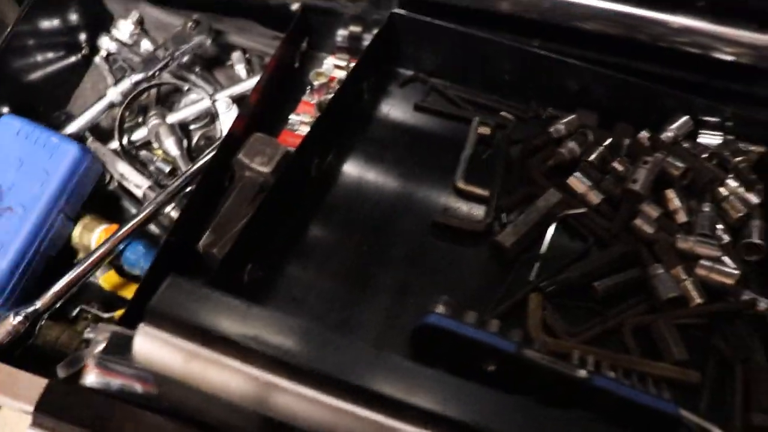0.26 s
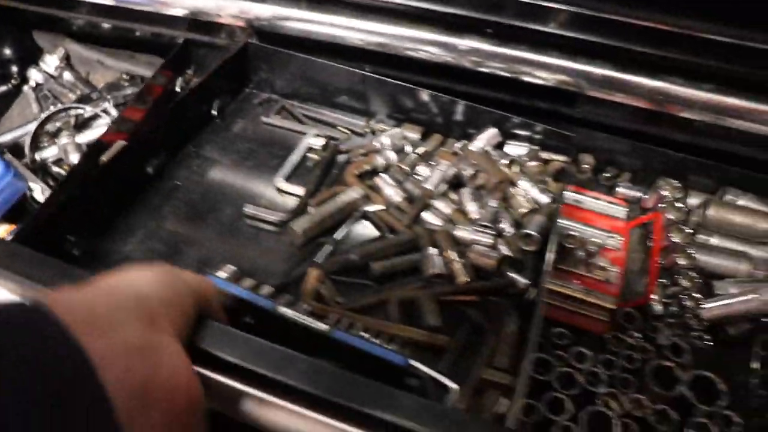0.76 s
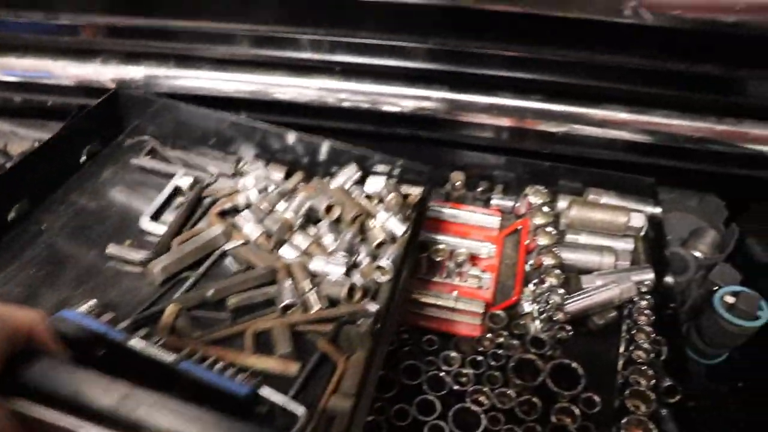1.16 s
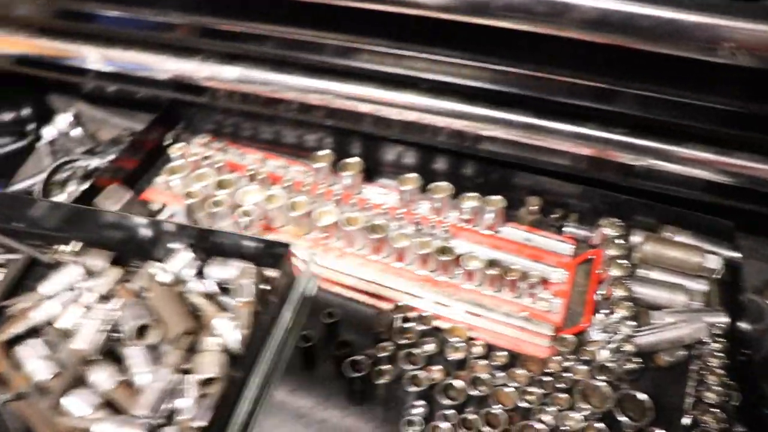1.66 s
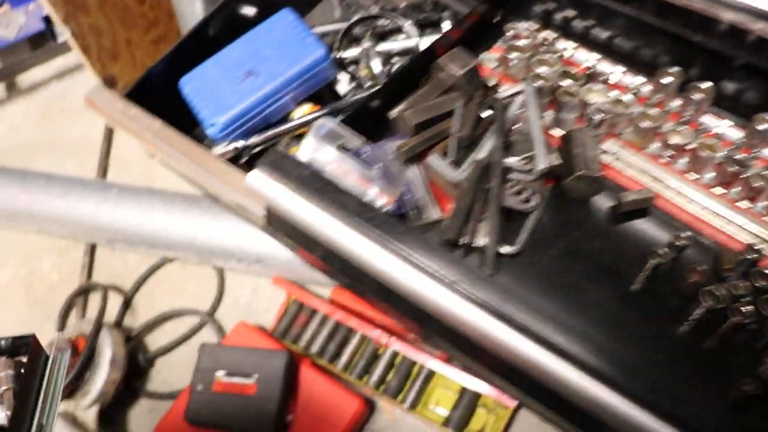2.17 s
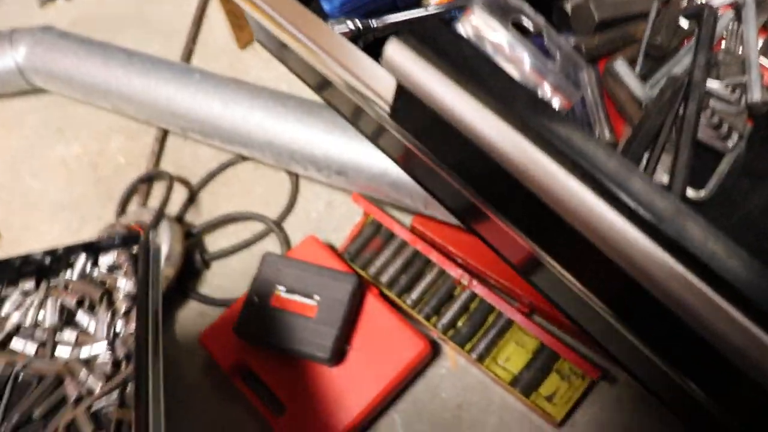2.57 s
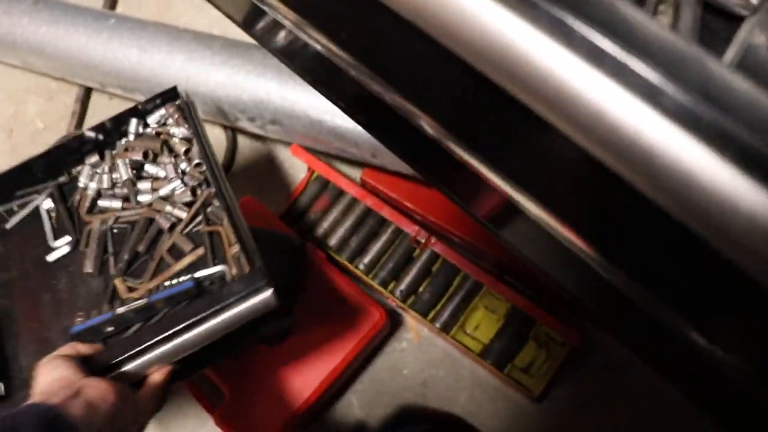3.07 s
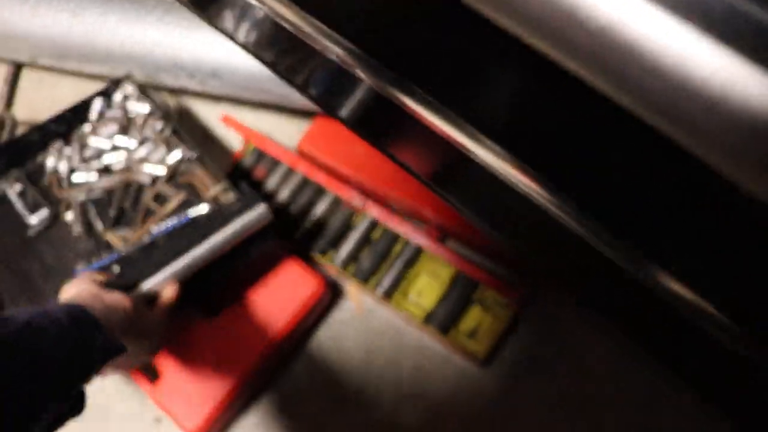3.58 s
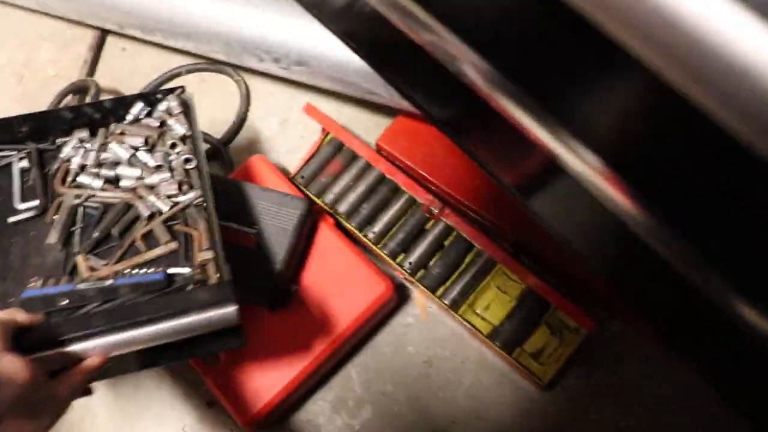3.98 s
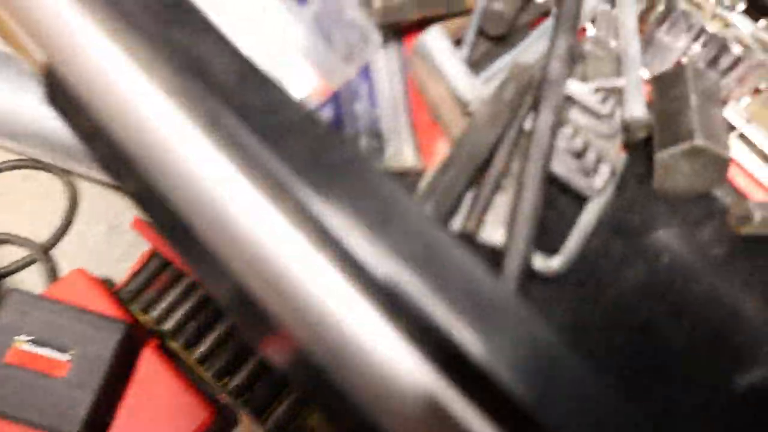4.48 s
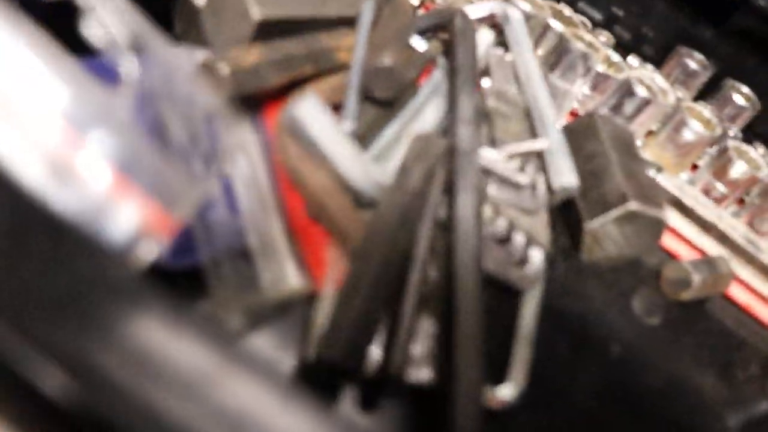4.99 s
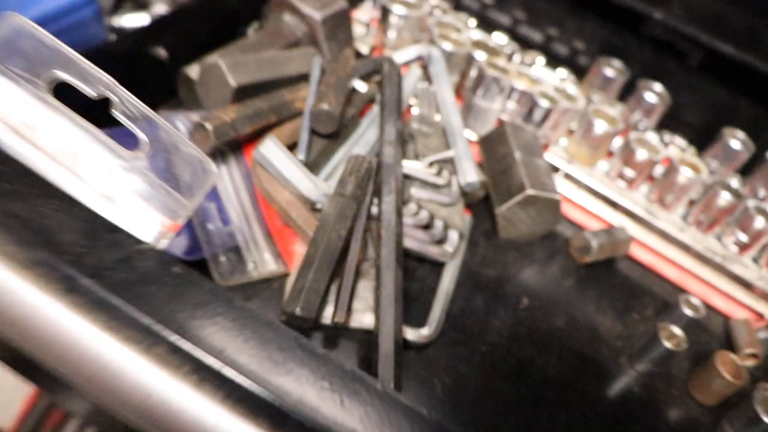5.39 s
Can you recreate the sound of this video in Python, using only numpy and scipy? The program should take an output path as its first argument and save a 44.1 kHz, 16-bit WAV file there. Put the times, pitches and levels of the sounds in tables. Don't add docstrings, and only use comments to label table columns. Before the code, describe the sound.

Close up in a quiet workshop, a steel tray of loose sockets bangs and scrapes across a drawer in dense clatter, the loudest knocks overloading. It lifts away with a light quick rattle, lands with a hard clank and gritty rubs, then lies nearly still. A few more clacks follow, then loose parts tumble in the drawer. Handheld stereo microphone, faint air and low handling rumble, load mostly left of middle.

```python
import sys
import numpy as np
from scipy import signal
from scipy.fft import rfft, irfft
from scipy.io import wavfile
from scipy.ndimage import uniform_filter1d

SR = 44100
rng = np.random.default_rng(int(sys.argv[2]) if len(sys.argv) > 2 else 0)


def volts_from_db(level):
    exponent = np.asarray(level, float) / 20
    return 10 ** exponent


def bounce(signal):
    frames = np.transpose(np.atleast_2d(signal))
    limited = np.clip(frames, -1, 1)
    pcm = np.round(limited * 32767).astype(np.int16)
    wavfile.write(sys.argv[1], SR, pcm)


N = 248724
T = np.arange(N) / SR

# (time [s], left-right level [dB], right lag [s])
PLACE = [
    (0, 3.5, 0.00014),
    (.7, -0.5, 0.000061),
    (1.5, 2, 0.000067),
    (2.5, 1, 0.00012),
    (3.3, 3, 0.000048),
    (4.3, 2, 0.00013),
    (4.8, 5, 0.00026),
    (5.64, 3.5, 0.0002),
]


def rms_one(x):
    return x / np.sqrt(np.mean(x ** 2) + 1e-20)


def at_hz(points, hz):
    point_hz, point_db = np.array(points)[:, :2].T
    return np.interp(np.log(hz + 1), np.log(point_hz), point_db)


def colour(x, points):
    hz = np.fft.rfftfreq(N, 1 / SR)
    return irfft(rfft(x) * volts_from_db(at_hz(points, hz)), N)


def pan(db):
    return volts_from_db(np.array([db / 2, -db / 2]))


def in_time(rows):
    s, *columns = np.transpose(rows)
    return [np.interp(T, s, column) for column in columns]


def lag_right(x):
    return np.interp(T - in_time(PLACE)[1], T, x)


def butter(x, order, hz, kind="low"):
    return signal.sosfilt(signal.butter(order, hz, kind, fs=SR, output="sos"), x)


def resonate(x, peaks):
    out, power = 0, 0
    for k, (hz, width, db) in enumerate(peaks):
        r = np.exp(-np.pi * width / SR)
        b = (1 - r * r) / 2 * volts_from_db(db) * (-1) ** k
        poles = [1, -2 * r * np.cos(2 * np.pi * hz / SR), r * r]
        out = out + signal.lfilter([b, 0, -b], poles, x + 1e-18)
        power += volts_from_db(db) ** 2 * np.pi * width / SR
    return out / np.sqrt(power)


def gliding(x, hz, width):
    out, state = np.zeros_like(x), np.zeros((2, 2))
    r = np.exp(-np.pi * width / SR)
    b = (1 - r * r) / 2 / np.sqrt(np.pi * width / SR)
    for i in range(0, N, 128):
        poles = [1, -2 * r * np.cos(2 * np.pi * hz[i] / SR), r * r]
        out[:, i:i + 128], state = signal.lfilter([b, 0, -b], poles, x[:, i:i + 128], zi=state)
    return out


def grit(per_s, size_db):
    # (frequency [Hz], level [dB])
    spread = [(100, -45), (400, -14.5), (1500, -5.5), (5000, -0.5), (15000, -0.5)]
    sizes = volts_from_db(size_db * np.minimum(rng.exponential(1, (2, N)), 5)) * rng.standard_normal((2, N))
    common, unlike = sizes * (rng.random((2, N)) < per_s / SR)
    unlike = colour(unlike, spread)
    return np.array([rms_one(common + unlike), rms_one(lag_right(common - unlike))])


def blows(times, levels_db, t60s, rise_s):
    out = np.zeros(N)
    for s, db, t60 in zip(times, levels_db, np.maximum(t60s, 0.005)):
        t = np.arange(round(t60 * SR)) / SR
        fall = (t / t60) ** 1.558
        shape = (1 - np.exp(-t / rise_s)) * volts_from_db(db - 60 * fall)
        i = round(s * SR)
        out[i:i + len(t)] += shape[:N - i]
    return out


def stutter(rate, depth_db):
    steps = rng.standard_normal(round(N / SR * 60) + 2)
    return volts_from_db(depth_db * np.interp(T * min(rate, 60), np.arange(len(steps)), steps))


def room_tone():
    # (frequency [Hz], density [dB per Hz])
    air_spectrum = [(59, -33), (100, 5.5), (181, 9), (620, -0.5), (1690, -20), (2520, -20.5), (8050, -18.5),
                    (14000, -64)]
    # (frequency [Hz], density [dB per Hz])
    rumble_spectrum = [(20, -36), (50, 8.5), (90, -0.5), (150, -23.5)]
    # (time [s], rumble level [dB])
    handling = [
        (0.0, -48),
        (0.14, -51),
        (2.32, -59),
        (2.39, -53),
        (3.22, -49),
        (3.3, -71),
        (3.58, -76),
        (3.79, -54),
        (5.64, -59),
    ]
    air_db = -51.5
    noise = grit(per_s=SR, size_db=0)
    rumble = colour(noise + 0.5 * rng.standard_normal((2, N)), rumble_spectrum)
    return volts_from_db(air_db) * rms_one(colour(noise, air_spectrum)) + volts_from_db(in_time(handling)[0]) * rms_one(rumble)


def knocks():
    # (time [s], body peak [dB], boom relative [dB], boom pitch [Hz])
    clacks = [
        (0.356, -16, -27, 360),
        (0.49, -10.5, 0.5, 188),
        (0.827, -18.5, 5, 422),
        (1.228, -2, -8.5, 486),
        (1.292, -20, 3.5, 950),
        (1.587, -19, -24, 259),
        (3.304, -4, -9, 945),
        (3.549, -35, -17, 395),
    ]
    # (time [s], body peak [dB], boom relative [dB], boom pitch [Hz])
    raps = [(.177, 0.5, -9, 273), (.203, 0, -8, 365), (.625, -17, -20, 600), (0.774, -13, 0, 470),
            (0.905, -12, 0, 440), (.916, -3, 0, 370), (1.413, -21, -14, 338), (1.562, -17.5, -8, 270),
            (2.356, -31.5, -3, 1100), (2.437, -26.5, 5.5, 184), (2.761, -17.5, -0.5, 202),
            (3.188, -17, -28, 476), (3.814, -39, -5, 1500), (3.827, -35, -3, 800), (4.168, -39, -1.5, 170),
            (4.381, -12, -23, 398)]
    # (time [s], body peak [dB], boom relative [dB], boom pitch [Hz])
    bumps = [(.635, -14, 7, 340), (0.723, -18, 4, 450), (.811, -21, 5, 470), (1.088, -20, 2, 950),
             (1.102, -22, 6, 290), (1.131, -24, 6, 850), (1.214, -18, -3, 900), (1.253, -13, -4, 450),
             (1.263, -16, -6, 500), (1.283, -13, -6, 500), (1.397, -12, -8, 300), (2.793, -30, 6, 210),
             (3.168, -30.5, -13, 136), (3.211, -23, -41, 406), (3.23, -24, -30, 400), (3.301, -12, -6, 600),
             (3.736, -39, 4, 1290), (3.856, -38.5, 4, 1615), (3.928, -34, -3.5, 1245),
             (4.245, -18, -28, 697), (4.256, -19, 3, 157), (4.3555, -21, 9, 327)]
    # (time [s], body peak [dB], boom relative [dB], boom pitch [Hz])
    jolts = [(0.237, -14.5, -7.5, 255), (.853, -23, 2, 400), (.946, -22, -1, 443), (1.17, -21.5, -5, 482),
             (1.187, -17.5, -17, 504), (1.398, -16, -10, 273), (2.399, -18.5, -6, 300),
             (2.728, -11, -3.5, 165), (3.389, -19, -7, 520), (4.262, -10, -17, 200), (4.278, -15, -20, 440),
             (4.464, -38, -11, 374)]
    # (time [s], body peak [dB], boom relative [dB], boom pitch [Hz])
    ticks = [(0.024, -36.5, -30, 400), (0.383, -14.5, -3, 332), (0.5106, -14, -4.5, 312),
             (0.619, -13, -24, 258), (1.171, -29, -20, 480), (1.224, -9.5, -7.5, 454),
             (1.3696, -13.5, -30, 624), (1.4133, -35, -14, 340), (1.564, -35, -15, 300),
             (1.576, -17.5, -7, 530), (1.5858, -5.5, -21, 261), (3.1884, -20.5, -12, 470),
             (3.3029, 1.5, -17, 546), (3.364, -12.5, -12, 454), (3.556, -30, -18, 400),
             (3.834, -25, -10, 304), (4.265, -16, -4.5, 405), (4.285, -34, -20, 400),
             (4.296, -26, -21, 400), (4.309, -15, -21, 400), (4.32, -17, -19, 400), (4.348, -18, -24, 400),
             (4.379, -20, -18, 400)]
    # (crack relative [dB], t60 [s])
    contact = [
        (-2.5, 0.043),
        (-9.5, 0.05),
        (-16.5, 0.047),
        (-13, 0.14),
        (-1.5, 0.02),
    ]
    # (time [s], body peak [dB], crack relative [dB], t60 [s])
    tumbles = [(4.619, -39, -24, 0.054), (4.643, -29.5, -5, 0.049), (4.674, -39.5, -5.5, 0.17),
               (4.737, -33.5, -5, 0.046), (4.782, -32.5, -12, 0.092), (4.805, -26.5, -8, 0.049),
               (4.854, -23, -38, 0.064), (4.872, -21, -29, 0.031), (4.892, 1.5, -2, 0.044),
               (4.972, -18.5, -22, 0.15), (4.993, -2.5, -3, 0.046), (5.148, -21, -7, 0.18),
               (5.167, -15.5, -9.5, 0.16), (5.267, -3.5, -3, 0.043), (5.321, -23, -3, 0.053),
               (5.52, -28, -30, 0.025)]
    drawer_boom_db, drawer_boom_hz = -37, 610
    rows = []
    for kind, (high_db, t60) in zip([clacks, raps, bumps, jolts, ticks], contact):
        rows += [(s, db, low_db, high_db, t60, hz) for s, db, low_db, hz in kind]
    return rows + [(s, db, drawer_boom_db, high_db, t60, drawer_boom_hz) for s, db, high_db, t60 in tumbles]


def thuds():
    kick_db, chatter_db = 19.5, 0.5
    out, contacts = np.zeros((2, N)), grit(per_s=6000, size_db=-0.5)
    t = np.arange(round(0.2 * SR)) / SR
    for s, body_db, low_db, high_db, t60, hz in knocks():
        i = round(s * SR)
        chatter = (1 - np.exp(-t / 0.0015)) * volts_from_db(chatter_db - 60 * t / (1.5 * t60))
        hit = contacts[:, i:i + len(t)]
        length = hit.shape[1]
        kick = volts_from_db(kick_db) * (t[:length] == t[40])
        hit = (chatter[:length] * hit + kick) * volts_from_db(body_db + low_db)
        flex = [(hz, 60, 0), (1.425 * hz, 150, -8), (0.8 * hz, 90, -10), (2.92 * hz, 300, -14)]
        out[:, i:i + length] += resonate(hit, flex)
    return out


def strokes():
    # (middle [s], length [s], level [dB], hiss relative [dB], ringing band [Hz])
    rubs = [(0.085, 0.064, -36.5, 4, 1630), (0.11, 0.018, -34, -40, 350), (0.235, 0.03, -32.5, 1, 1610),
            (0.762, 0.094, -25, -49, 462), (1.133, 0.21, -28, -53, 900), (1.289, 0.087, -26, 0.5, 1920),
            (1.548, 0.14, -26.5, -31, 900), (2.272, 0.14, -39.5, -34, 2050),
            (3.244, 0.022, -31.5, -45, 1700), (3.352, 0.061, -20, -1.5, 1420),
            (3.403, 0.048, -31, 6.5, 1610), (3.445, .025, -30, -8, 1640), (3.484, 0.099, -21, -0.5, 1470),
            (3.57, 0.14, -33, -10, 1680), (3.705, 0.074, -34, -53, 1210), (3.752, 0.058, -41, -42, 870),
            (3.893, 0.21, -56.5, -2, 5570), (4.302, 0.15, -26.5, -8.5, 1560),
            (4.957, 0.073, -37, -16, 1800), (5.047, 0.25, -27.5, -6.5, 1823),
            (5.229, 0.063, -18.5, -11, 1810), (5.323, 0.02, -27, -8, 1700), (5.37, 0.07, -24, -4, 1930),
            (5.53, 0.054, -32.5, -36, 1270), (5.574, 0.072, -38, -16, 1930), (5.607, 0.052, -40, -14, 1500)]
    body, bright, contacts = np.zeros((2, N)), np.zeros(N), grit(per_s=2200, size_db=1.0)
    for s, length, db, hiss_db, hz in rubs:
        i = round((s - length) * SR)
        swell = np.hanning(round(2 * length * SR)) ** 3.18
        swell = swell[:N - i]
        part = slice(i, i + len(swell))
        band = [(hz, 260, 0), (0.84 * hz, 160, -3), (1.14 * hz, 160, -3), (0.39 * hz, 400, -4),
                (1.24 * hz, 900, -5)]
        body[:, part] += volts_from_db(db) * resonate(swell * contacts[:, part], band)
        bright[part] += volts_from_db(db + hiss_db) * swell
    return body, bright


def sliding():
    # (start [s], length [s], scrape level [dB], tray boom relative [dB], boom pitch [Hz])
    slides = [(0.13, .02, -48, 3, 355), (0.315, 0.064, -30.5, 2, 264), (0.361, 0.091, -29, -1.5, 365),
              (0.465, 0.17, -33.5, -1, 182), (0.782, 0.094, -25.5, -6, 466), (0.993, 0.27, -28, -10, 310),
              (1.394, 0.12, -28.5, -6, 278), (1.7, 0.051, -35.5, -11.5, 306), (2.28, 0.014, -43, -14, 316),
              (3.445, 0.015, -17, -18, 440), (3.697, 0.047, -43, 5, 227), (4.388, 0.025, -27.5, -16, 370),
              (4.843, 0.61, -30.5, -23, 514), (5.304, 0.041, -19, -27, 520), (5.53, 0.11, -37, -5.5, 292)]
    swell_db_per_s, fade_db_per_s = 138, 118
    rest_scrape_db, rest_boom_db, rest_hiss_db = -46, -64, -62.5
    slide_hiss_db, hiss_per_boom = -18.5, -0.2
    scrape, boom, hiss = np.array([[rest_scrape_db], [rest_boom_db], [rest_hiss_db]]) + 0 * T
    for s, length, db, boom_db, hz in slides:
        before, after = np.maximum(s - T, 0), np.maximum(T - s - length, 0)
        load = db - swell_db_per_s * before - fade_db_per_s * after
        scrape, boom = np.maximum(scrape, load), np.maximum(boom, load + boom_db)
        hiss = np.maximum(hiss, load + slide_hiss_db + hiss_per_boom * boom_db)
    boom_hz = in_time([(s, hz) for s, *_, hz in slides])[0]
    return scrape, boom, hiss, boom_hz


def jostle(load):
    heap_hz = [1320, 1510, 1670, 1800, 2010, 2430, 2750, 3000, 3220, 3650, 4140, 4430, 4730, 5140, 5330,
               5790, 6130, 6320, 6790, 7500, 8280, 8840]
    touches_per_s, ring_width_hz, jostle_db = 600, 60, -4
    touches = load * np.tanh(2 * rng.standard_normal(N)) * (rng.random(N) < touches_per_s / SR)
    dealt = rng.integers(len(heap_hz), size=N)
    out = sum(resonate(touches * (dealt == k), [(hz, ring_width_hz, 0)]) for k, hz in enumerate(heap_hz))
    return volts_from_db(jostle_db) * np.sqrt(SR / touches_per_s) * np.array([out, lag_right(out)])


def tray():
    # (frequency [Hz], width [Hz], level [dB])
    floor_modes = [(173, 75, -1.5), (231.5, 77, 0.5), (347.4, 9.7, -3.5), (440, 21, -6), (520, 27, -4)]
    # (frequency [Hz], width [Hz], level [dB])
    wall_modes = [(910, 238, -7.5), (1237.5, 192, 3), (1300.5, 270, 2), (1700, 440, -2.5),
                  (2037, 257, -2.5), (2290, 350, -2.5), (2620, 1320, -9)]
    # (frequency [Hz], width [Hz], level [dB])
    drawer_modes = [(530, 340, -7), (900, 400, -3), (1330, 490, -2.5), (1772, 266, 1.5), (2530, 750, -5),
                    (3260, 2100, -9)]
    # (frequency [Hz], density [dB per Hz])
    crack_spectrum = [(1760, -17.5), (3000, -5.5), (3300, -4.5), (4350, -3), (8760, -6), (13700, -11),
                      (15500, -15)]
    tray_gone_s = 4.55
    strike_db = 13.5
    scrape_db, boom_db, hiss_db, boom_hz = sliding()
    at, body_db, low_db, high_db, t60, hz = np.transpose(knocks())
    rubbed, rub_hiss = strokes()

    scrape = volts_from_db(scrape_db + 1.0) * stutter(rate=46, depth_db=4.5)
    force = scrape + blows(at, body_db - 0.5, t60, rise_s=0.000094)
    force = force * grit(per_s=4000, size_db=-1.0)
    force[:, np.round(at * SR).astype(int) + 8] += volts_from_db(body_db + strike_db)
    walls = resonate(force * (T < tray_gone_s), wall_modes) + resonate(force * (T >= tray_gone_s), drawer_modes)
    walls = butter(walls, 2, 4200) + rubbed

    drag = volts_from_db(boom_db) * grit(per_s=2300, size_db=3.0)
    floor = volts_from_db(4.5) * gliding(drag, boom_hz, width=47) + volts_from_db(6.5) * resonate(drag, floor_modes)
    floor = butter(floor, 4, 150, "high") + butter(thuds(), 2, 110, "high")

    hiss = rms_one(colour(grit(per_s=7300, size_db=-0.5), crack_spectrum))
    lower = butter(hiss, 1, 8000)
    steady = (volts_from_db(hiss_db + 1.0) + rub_hiss) * stutter(rate=50, depth_db=1.8)
    crack = blows(at, body_db + high_db, 0.81 * t60, rise_s=0.0019)
    top = blows(at, body_db + 4.7 * high_db + 11.5, 0.42 * t60, rise_s=0.0028)
    bright = (steady + crack) * lower + (steady + top) * (hiss - lower) + jostle(steady)
    side_db = in_time(PLACE)[0]
    return walls * pan(side_db) + floor * pan(3.2)[:, None] + bright * pan(side_db + 2.0)


def sockets():
    # (time [s], pitch [Hz], peak # [dB], left-right level [dB], t60 [s])
    damped_tones = [(.4915, 3080, -3, 3, .017), (.493, 3300, -9, 3, .035), (.4935, 4930, -10, 8, .04),
                    (.5115, 9954, -11, 8, .016), (.5115, 5650, -9, 5, .013), (.6165, 6330, -7, 4, .02),
                    (.624, 4300, -18, 2, .025), (.636, 2640, -13, 0, .03), (.726, 2444, -16, -4, .04),
                    (.779, 2450, -15, -2, .04), (.827, 4000, -20, 2, .015), (.922, 2200, -8, 0, .03),
                    (1.228, 12823, -16, 9, .03), (1.588, 10860, -20, 7, .03), (1.576, 14300, -24, 7, .012),
                    (3.188, 2730, -17, 3, .03), (3.189, 4300, -21, 4, .025), (3.189, 1670, -18, 3, .04),
                    (3.305, 1324, 0, 2, .028), (3.307, 4660, -12, 3, .045), (3.493, 1300, -16, 3, .02),
                    (3.733, 1230, -30, 2, .05), (3.736, 440, -28, 2, .05), (3.755, 860, -33, 2, .06),
                    (3.855, 1600, -29, 2, .04), (3.928, 2300, -27, 2, .025), (.179, 1650, -6, 3, .04),
                    (.206, 1700, -8, 3, .03), (.358, 1750, -14, 3, .025), (4.168, 2050, -36, 3, .06),
                    (3.929, 1180, -32, 2, .05), (3.95, 480, -38, 2, .08), (4.246, 1900, -22, 3, .03),
                    (4.264, 4600, -15, 4, .015), (4.381, 2450, -17, 3, .04), (4.893, 3661, -14, 4, .033),
                    (4.891, 880, -4, 2, .035), (4.897, 1830, -7, 3, .04), (4.996, 1750, -1, 3, .035),
                    (5.27, 3082, -12, 4, .033),
                    (1.229, 237, -11.5, 2, 0.085), (1.232, 160, -16, 1, 0.18), (3.303, 336, -3.5, 4, 0.031),
                (3.304, 164, -23, -3, 0.072), (3.327, 440, -15.5, 5, 0.1), (3.347, 910, -19, 2, 0.045),
                (3.362, 2300, -16, 3, .02), (3.425, 1950, -16, 3, .03), (3.447, 1500, -20, 1, .025),
                (3.478, 1800, -13.5, 1, 0.02), (4.283, 1300, -14, 6, 0.019), (4.293, 1450, -10, 3, 0.053),
                (4.312, 440, -21.5, 5, 0.13), (5.018, 1880, -25, 3, .025), (5.036, 1880, -23, 3, 0.028),
                (5.208, 2000, -15, 3, .025), (5.229, 1640, -24, 3, .03), (5.323, 1700, -21, 3, .03),
                (5.356, 1950, -22, 1, .025), (.735, 270, -18, -6, 0.16), (2.401, 4300, -29, 0, 0.032),
                (2.4, 530, -18, 3, 0.026), (.923, 3340, -7, -1, 0.023), (2.73, 3200, -43, 3, 0.04),
                (.76, 490, -18, 0, .04), (5.268, 70, -27, 2, 0.039), (2.43, 66, -29, 2, .12),
                (1.985, 74, -32, 8, 0.074)]
    # (time [s], pitch [Hz], peak [dB], t60 [s])
    rings = [(.25, 7590, -36, .1), (.31, 9432, -41, .2), (.385, 9445, -41, .25), (.385, 13200, -42, .2),
             (1.229, 1680, -6, .04), (4.997, 2780, -14, .05), (5.268, 1550, -4, .032),
             (5.27, 2450, -14, .05), (5.53, 1950, -34, .25), (5.57, 1500, -35, .2), (.512, 12500, -35, .12),
             (1.188, 11119, -14, .08), (1.188, 5259, -22, .1), (1.19, 13141, -38, .1),
             (1.313, 14570, -28, .1), (1.38, 13596, -34, .1), (1.394, 13596, -27, .05),
             (1.596, 14565, -16, .1), (3.836, 13450, -45, .08), (3.187, 10425, -32, .09),
             (3.525, 11750, -37, .1), (3.55, 10627, -37, .1), (3.585, 11750, -40, .1),
             (3.836, 10760, -39, .15), (3.82, 800, -31, .25), (4.266, 14570, -22, .08),
             (4.27, 10500, -26, .07), (4.28, 11749, -24, .14), (4.285, 14048, -25, .08),
             (4.35, 13124, -31, .08), (5.03, 14532, -33, .16)]
    swell_s, ring_beat = 0.006, 0.55
    heap_side_db = in_time(PLACE)[0] + 8
    clinks = [(s, hz, db, t60, side_db, 0.0003, 0.25) for s, hz, db, side_db, t60 in damped_tones]
    for s, hz, db, t60 in rings:
        clinks.append((s, hz, db, t60, heap_side_db[round(s * SR)], swell_s * min(t60 * 10, 1), ring_beat))
    out = np.zeros((2, N))
    chance = rng.random((len(clinks), 3))
    for (s, hz, db, t60, side_db, rise_s, beat), (split, start, turn) in zip(clinks, chance):
        i = round(s * SR)
        t = np.arange(min(round(2 * t60 * SR), N - i)) / SR
        phase = 2 * np.pi * (hz * t + start + np.array([[0], [0.2 * turn]]))
        pair = np.sin(phase) + beat * np.sin(phase + 2 * np.pi * (25 + 40 * split) * t)
        decay = volts_from_db(-60 * t / t60) + volts_from_db(-34 - 25 * t / t60)
        ring = volts_from_db(db - 3) * (1 - np.exp(-t / rise_s)) * decay * pair
        out[:, i:i + len(t)] += pan(side_db)[:, None] * ring
    return out


def rattle(taps, part, ring_db, body_hz, body_db):
    at, db = np.transpose(taps)
    tick = blows(at, db - 12.5, 0 * at + 0.025, rise_s=0.0002)
    tick = tick * resonate(grit(per_s=15000, size_db=2.5), [(3400, 830, 0)])
    push = np.zeros(N)
    push[np.round(at * SR).astype(int)] = volts_from_db(db + ring_db)
    push[np.round((at + 0.0028) * SR).astype(int)] = volts_from_db(db + ring_db - 10)
    ring = resonate(signal.lfilter([1, -0.75], [1], push), part)
    body = [(body_hz, 120, 0), (0.87 * body_hz, 120, -7)]
    late_push = np.roll(push, round(0.00129 * SR))
    ring = ring + volts_from_db(body_db) * resonate(resonate(late_push, body), body)
    return pan(3.4)[:, None] * (tick + [ring, lag_right(ring)])


def carried_part():
    # (time [s], peak [dB])
    first_taps = [
        (1.7255, -38),
        (1.7953, -29.5),
        (1.8297, -25.5),
        (1.8758, -23),
        (1.8975, -22),
        (1.9225, -22),
        (1.94, -20),
        (1.987, -36),
        (2.019, -36),
    ]
    # (time [s], peak [dB])
    second_taps = [
        (2.1115, -25),
        (2.151, -27),
        (2.174, -28),
        (2.2115, -28.5),
        (2.235, -29),
        (2.261, -26),
        (2.281, -27),
        (2.296, -28),
    ]
    # (frequency [Hz], width [Hz], level [dB])
    first_modes = [(740, 150, -9), (1060, 120, -8), (1460, 35, -9), (2380, 35, -4), (2990, 40, -2),
                   (4220, 40, 2), (5260, 150, -8), (6190, 210, -16)]
    # (frequency [Hz], width [Hz], level [dB])
    second_modes = [(1040, 90, 0), (1420, 30, 0), (1670, 44, -6), (2390, 40, -1), (3020, 30, -1),
                    (4250, 40, 2), (6180, 210, -16)]
    first = rattle(first_taps, first_modes, ring_db=19.5, body_hz=1687, body_db=-25)
    return first + rattle(second_taps, second_modes, ring_db=24.0, body_hz=1047, body_db=-38.0)


def skid():
    # (time [s], pitch [Hz], level [dB])
    path = [
        (3.64, 13300, -85),
        (3.69, 13600, -65),
        (3.73, 11800, -67),
        (3.76, 11000, -88),
        (3.88, 12300, -82),
        (3.94, 13700, -63),
        (3.99, 12200, -66),
        (4.06, 8700, -68),
        (4.09, 7500, -88),
    ]
    lower_ratio, width_hz = 0.73, 260
    hz, db = in_time(path)
    wander = width_hz * rms_one(uniform_filter1d(rng.standard_normal((2, N)), size=150))
    tones = np.sin(2 * np.pi * np.cumsum(hz * [[1], [lower_ratio]] + wander, axis=1) / SR)
    return volts_from_db(db) * tones.sum(axis=0) * pan(3.5)[:, None]


def shop(x):
    t60_s, tail_db = 0.27, -16
    t = np.arange(SR // 2) / SR
    common, unlike = rng.standard_normal((2, len(t))) * volts_from_db(-60 * t / t60_s) * (t > 0.006)
    unlike = butter(unlike, 2, 900, "high")
    tail = signal.lfilter([1], [1, -0.6], [common + unlike, common - unlike])
    tail = tail / np.sqrt(np.sum(tail ** 2) / 2)
    return volts_from_db(tail_db) * signal.fftconvolve(x, tail, axes=1)[:, :N]


def scene():
    near = tray() + sockets() + carried_part()
    return near + shop(near) + room_tone() + skid()


def band_limit(x):
    return signal.sosfilt(signal.butter(12, 15640, fs=SR, output="sos"), x)


def record(dry):
    overload = 1.0
    mix = np.clip(dry, -overload, overload)
    return band_limit(mix)


dry = scene()
out = record(dry)
bounce(out)
```